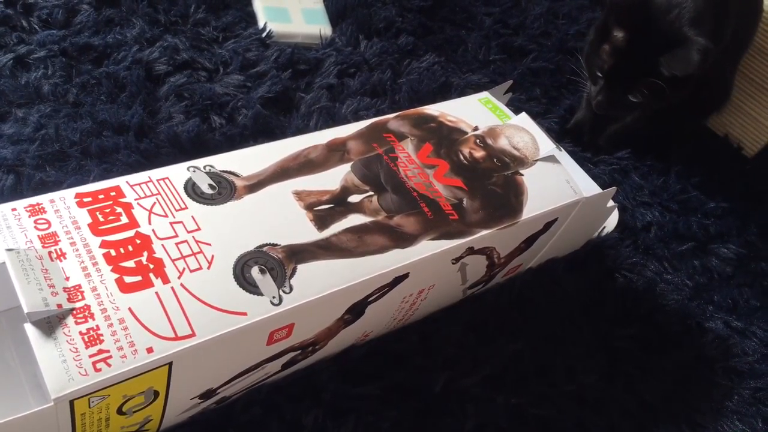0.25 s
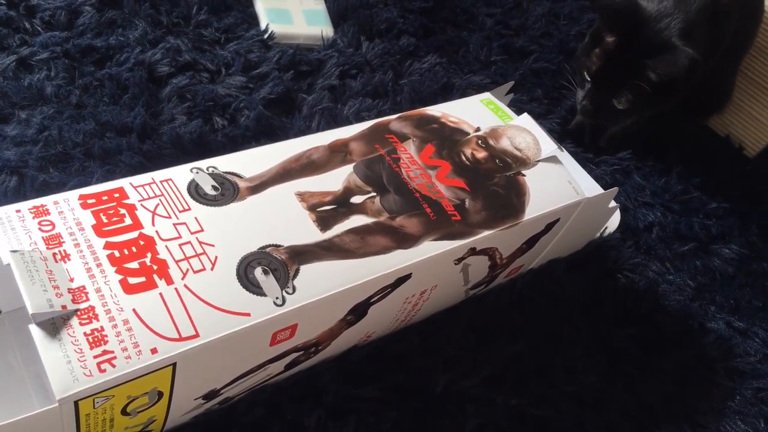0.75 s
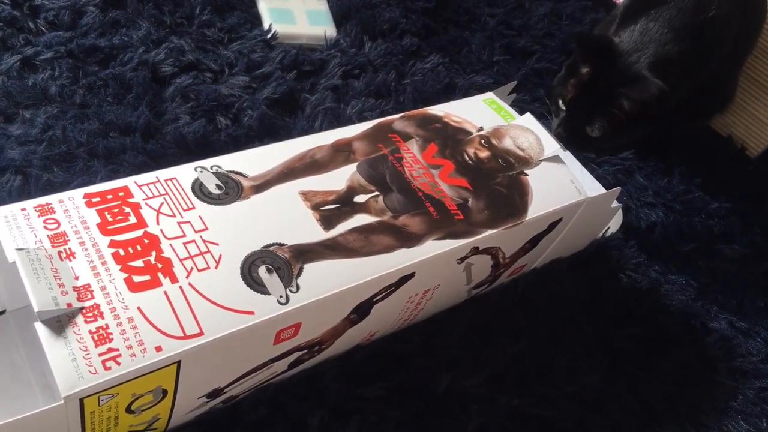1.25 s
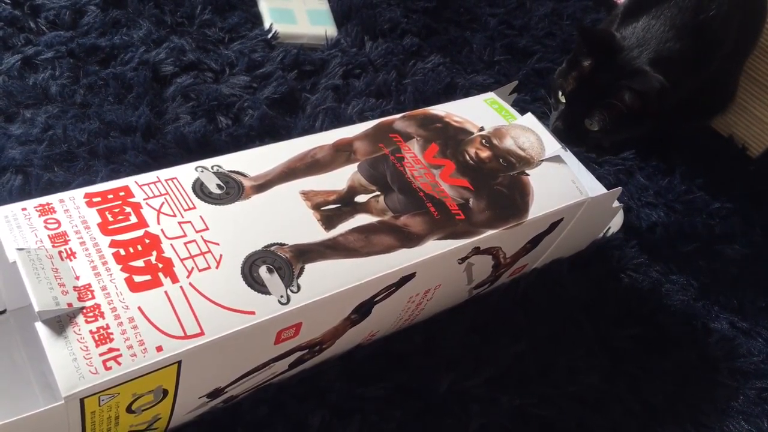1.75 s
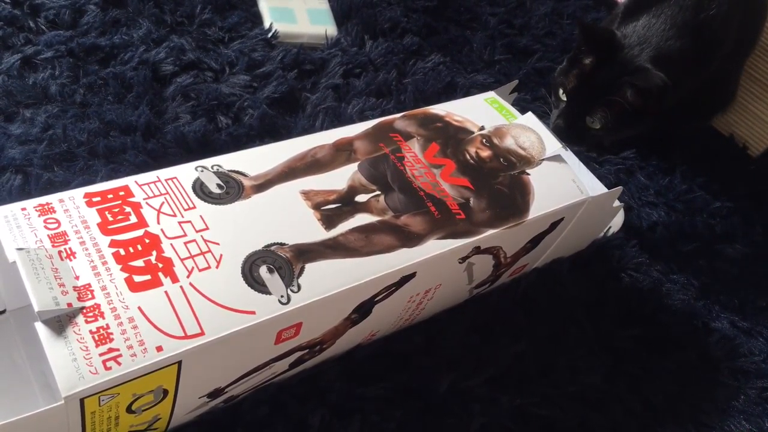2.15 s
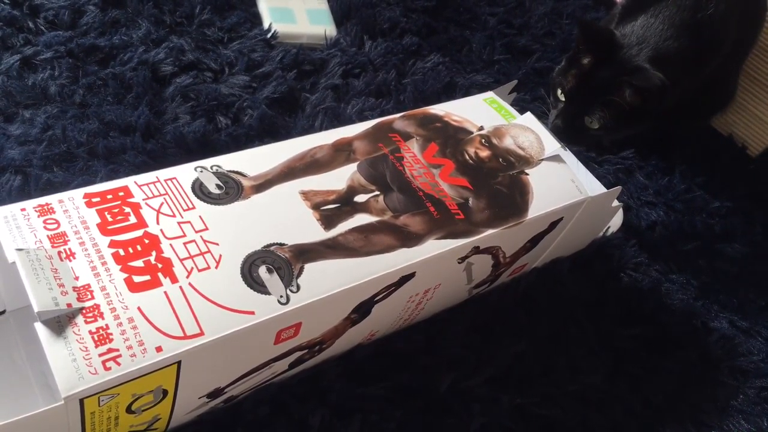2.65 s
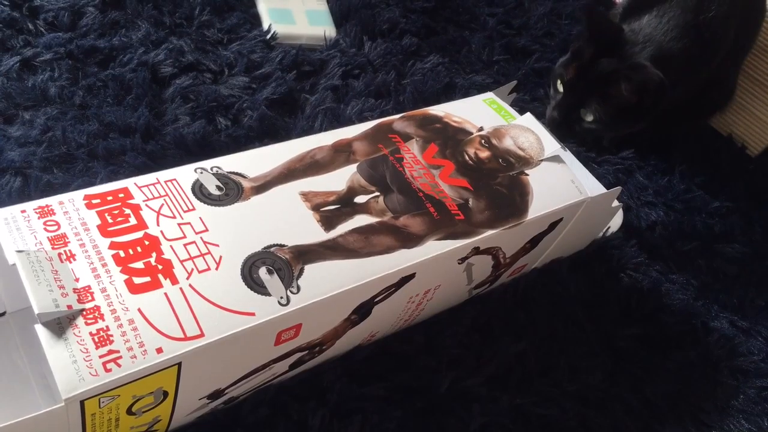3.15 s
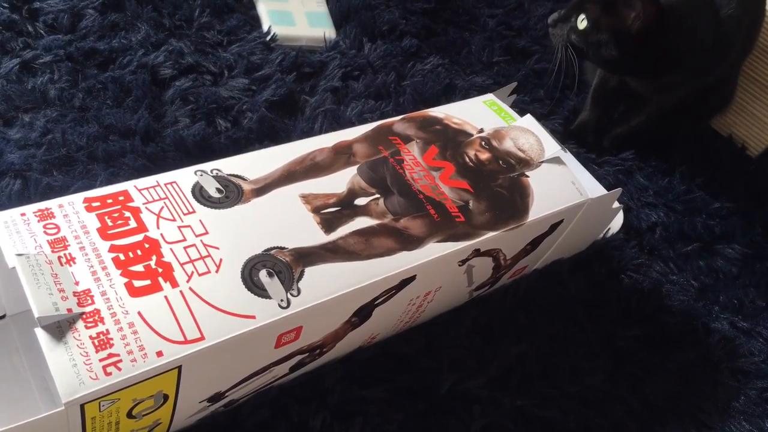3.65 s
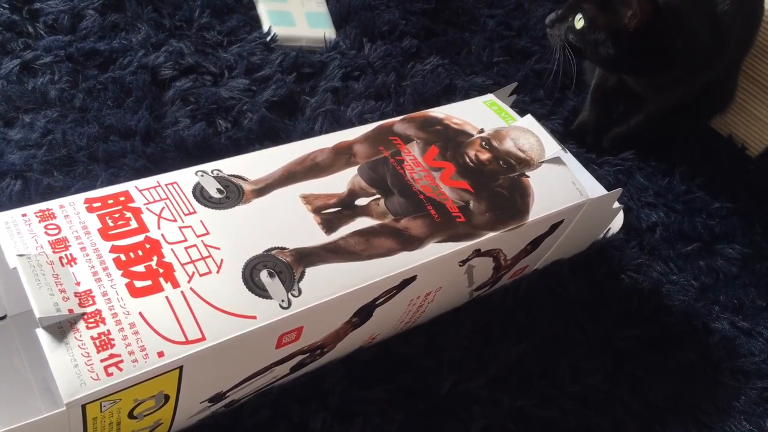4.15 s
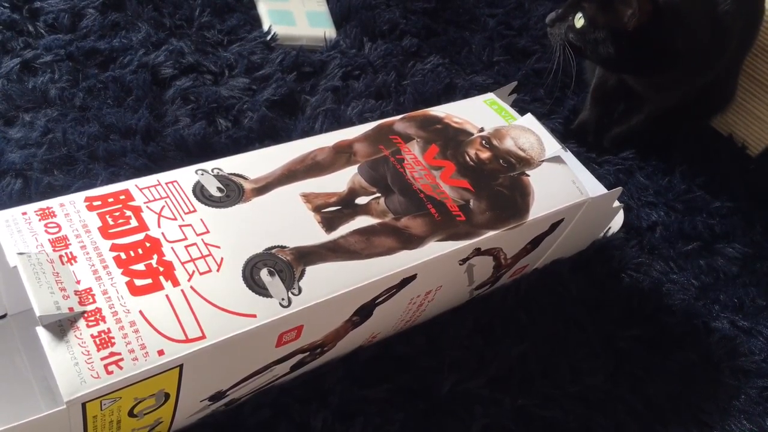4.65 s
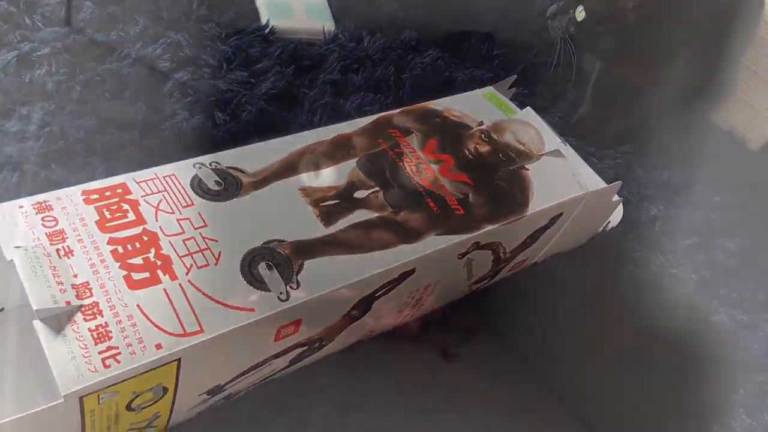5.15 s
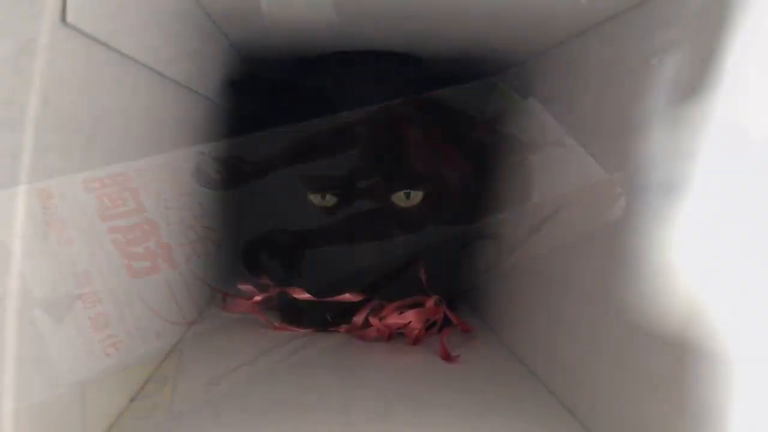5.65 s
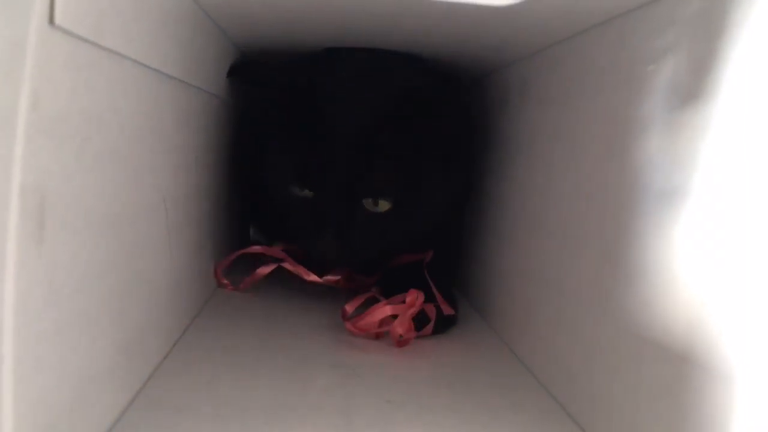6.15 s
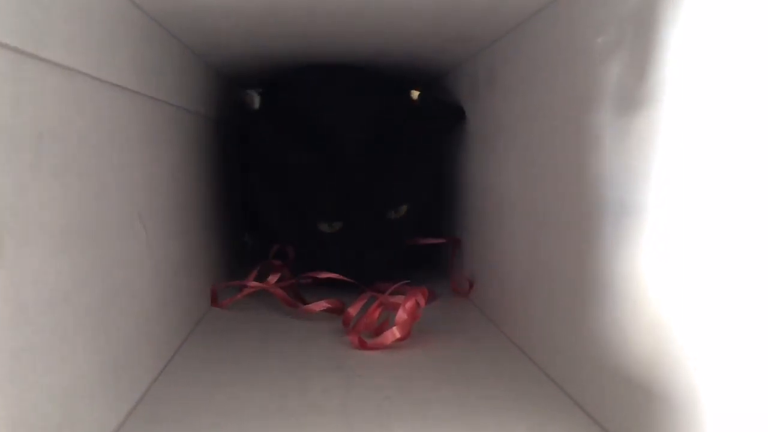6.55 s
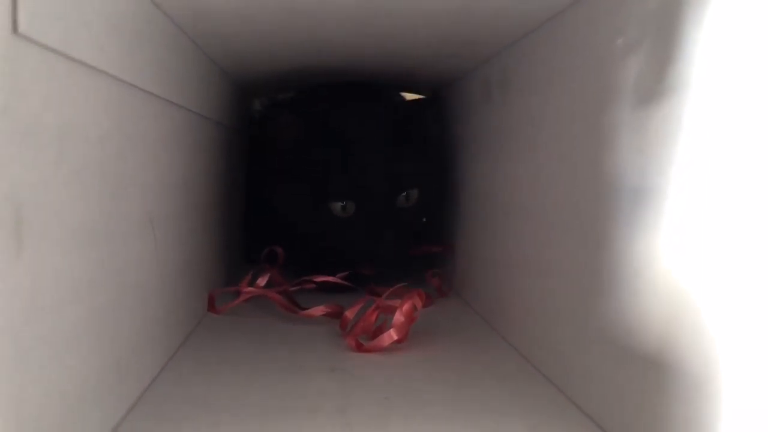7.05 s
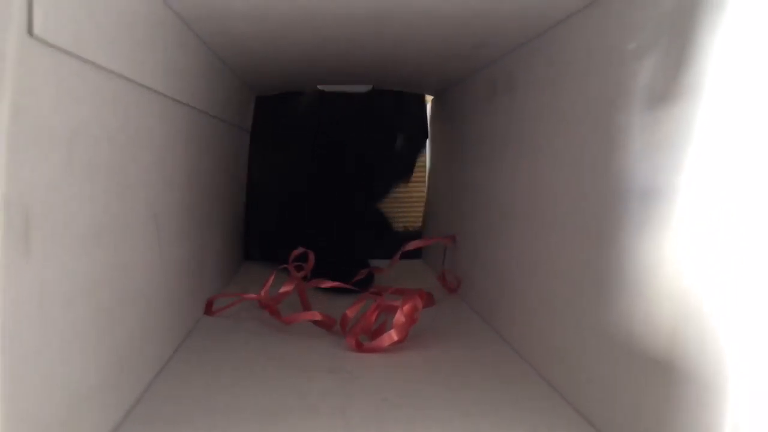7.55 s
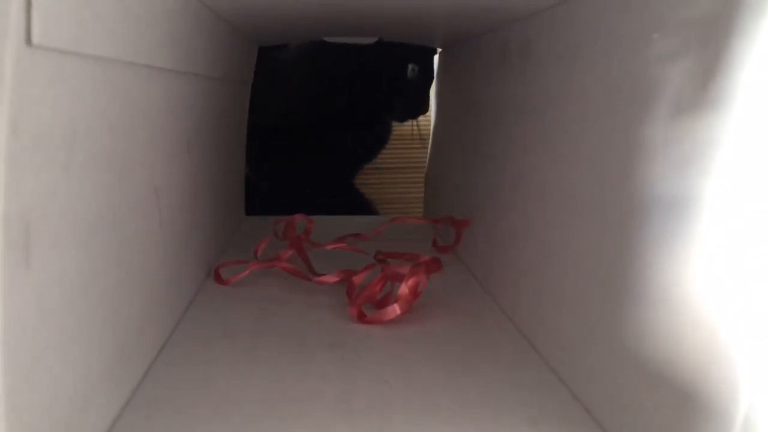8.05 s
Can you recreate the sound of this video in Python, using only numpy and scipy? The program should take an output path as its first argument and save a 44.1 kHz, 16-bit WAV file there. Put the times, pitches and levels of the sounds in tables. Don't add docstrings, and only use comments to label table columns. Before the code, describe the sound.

A phone held close beside a cardboard box catches light isolated claw clicks over faint street noise and hiss. It then bumps to the box mouth, where the sound turns hollow and low. Fur brushes the cardboard in bursts, claws scratch and tap, paws give dull knocks and one fuller thud, then a dense cluster of sharp ticks dies away into soft rumble.

```python
import sys
import numpy as np
from scipy import signal
from scipy.fft import rfft, irfft
from scipy.io import wavfile
from scipy.ndimage import uniform_filter1d

SR = 44100
rng = np.random.default_rng(int(sys.argv[2]) if len(sys.argv) > 2 else 0)


def gain_from_db(level_db):
    decades = np.asarray(level_db, float) / 20
    return 10 ** decades


def digitize_waveform(pressure):
    field = np.atleast_2d(pressure).T
    bounded = np.clip(field, -1, 1)
    quanta = np.round(bounded * 32767).astype(np.int16)
    wavfile.write(sys.argv[1], SR, quanta)


N = 366030
CHANGE_S = 4.764

# [start_s, peak_db, ring_hz, thump_db and snap_db against the ring]
TICKS = [(0.4863, -54, 2580, 5, -13), (0.5002, -51, 1750, -6, -27), (0.789, -51.5, 1760, -3, -29),
         (0.8435, -35, 1700, -6.5, -32), (0.8545, -46.5, 3460, 1, -21), (0.9415, -54.5, 1720, -14, -15),
         (1.1437, -36, 1840, -10.5, -20), (1.2619, -41.5, 1660, 4, -28), (1.2704, -50, 1660, -4, -22),
         (2.3913, -45.5, 1650, -11, -18), (3.488, -52, 1010, 5, -24), (3.544, -30, 2260, -14, -23),
         (4.2653, -38.5, 2420, -2.5, -21), (4.8095, -43, 6100, -10, -19), (5.018, -43, 2730, -13, -14)]
# [start_s, peak_db, ring_hz, thump_db and snap_db against the ring]
TAPS = [(5.4794, -62, 1630, 3, 1), (5.8592, -48, 4520, -20, 3), (5.8745, -46.5, 4130, -9, -5),
        (5.73, -61, 6000, -20, 2), (5.9848, -37, 6650, -17, -3), (6.195, -56, 3600, -14, -13),
        (6.2038, -32.5, 2230, -11, -9), (6.3539, -38, 2500, -7, -8.5), (6.3663, -44, 4000, -24, -5),
        (7.1814, -51, 3950, -14, -7), (7.4992, -37.5, 1560, -12, -20), (7.655, -34, 2150, -17, -15),
        (7.6941, -35, 3680, -20, -9), (7.7009, -33.5, 2470, -31, -4.5), (7.7485, -35, 2120, -33, -10),
        (7.7568, -31.5, 3960, -17, -15), (7.7912, -33, 4040, -26, -14), (7.8187, -42.5, 3800, -18, -13),
        (7.9271, -57, 1890, 4, -22), (7.767, -57, 8000, -24, 4), (7.775, -58, 9000, -24, 4),
        (7.737, -58, 9500, -24, 4)]
# [start_s, peak_db, ring_hz, thump_db and snap_db against the ring]
DRAGS = [(0.4405, -55, 1100, 9, -29), (0.5186, -52, 1710, -8, -26), (0.8345, -42, 2400, -18, -29),
         (1.1055, -42.5, 3370, -3.5, -16), (1.2515, -35.5, 1800, -7.5, -19.5), (2.3871, -42, 1260, 3, -7.5),
         (2.784, -56, 1670, -5, -14), (2.8046, -55.5, 1790, 2.5, -21), (4.9395, -60, 1080, 9, -4),
         (5.2346, -40.5, 2530, -6, -15), (5.561, -52, 800, 5, -20), (5.59, -54, 1100, 4, -25),
         (5.6347, -54, 1090, -10, -2), (7.7107, -42, 2450, -8, -19)]
# [pitch_hz, level_db]
BOARD = [(290, -52.5), (500, -13), (754, -8), (1150, -4), (1380, -16.5), (1580, -8), (1720, -7),
         (2110, -10), (2590, -7), (3030, -22), (3420, -8.5), (4300, -15.5), (4980, -28.5), (6490, -20.5),
         (9000, -33), (11700, -28.5), (19800, -120)]
# [pitch_hz, width_hz, level_db]
PANEL = [(360, 51, -3), (672, 93, -2.5), (224, 74, -17.5)]
TICK_MS, TAP_MS, DRAG_MS = 2.148, 2.1, 7.3
TICK_LOW_HZ, TAP_LOW_HZ = 250, 1300


def tick(db, hz, thump_db, snap_db, ms, low_hz):
    t = np.arange(2600) / SR
    u = t * 2500 / max(ms, 0.3)
    contact = u * np.exp(1 - u)
    fibres = rng.standard_normal((2, len(t))) * contact
    release = signal.unit_impulse(len(t), np.argmax(contact))

    ring = band(fibres[0] + 7.0 * release, hz * 0.96, hz * 1.04, order=1)
    struck = signal.fftconvolve(fibres[0] + 6.5 * release, causal(BOARD))[:len(t)]
    body = band(struck, low_hz, 19000, order=1)
    snap = band(fibres[1] + 2.5 * release, 5600, 9000, order=1)
    snap = band(snap, 4500, 16000, order=1)
    thump = np.zeros(len(t))
    for face_hz, width, face_db in PANEL:
        face = band(release, face_hz - width / 2, face_hz + width / 2, order=1)
        thump += gain_from_db(face_db) * face / width
    thump = band(thump, 92, 1200)

    claw = peaked(0.75 * peaked(ring) + peaked(body))
    return gain_from_db(db) * (claw + gain_from_db(snap_db + 3.0) * peaked(snap) + gain_from_db(thump_db - 2.5) * peaked(thump))


# [start_s, peak_db, pitch_hz, length_ms]
GLINTS = [(1.1075, -52, 2480, 4), (.8435, -42, 1650, 6), (1.1445, -48, 1850, 3.5), (1.139, -58, 2300, 2),
          (1.147, -54, 800, 8), (1.251, -50, 2200, 3), (1.255, -51, 4270, 4), (1.262, -50, 824, 6),
          (1.27, -56, 2550, 4), (.857, -56, 3450, 9), (6.204, -46, 4000, 2), (4.2655, -47, 711, 7),
          (4.266, -55, 1250, 4), (4.81, -50, 668, 8), (4.81, -49, 2290, 3), (5.02, -57, 3400, 3),
          (3.489, -59, 700, 8), (2.803, -61, 680, 8), (3.55, -48, 290, 14), (4.766, -54, 650, 8),
          (5.561, -49, 800, 4), (5.984, -48, 5800, 2), (6, -44, 950, 4), (7.1225, -51, 1200, 4),
          (7.128, -53, 980, 5), (7.718, -48, 2300, 2), (7.718, -50, 6600, 2), (7.132, -40, 560, 6),
          (7.185, -52, 4200, 3), (7.5, -49, 3650, 4), (7.654, -46, 2200, 5), (7.674, -51, 2250, 3),
          (7.7495, -40, 4700, 1.5), (7.761, -43, 1000, 6.5), (7.738, -56, 1800, 4), (7.792, -47, 2300, 2),
          (7.792, -50, 6340, 2), (7.798, -50, 2650, 5), (7.8, -54, 4000, 2), (7.702, -45, 5500, 2),
          (7.694, -47, 5500, 2)]


def glint(db, hz, ms):
    t = np.arange(3000) / SR
    u = t * 3000 / max(ms, 0.5)
    patch = np.sin(2 * np.pi * hz * t)
    neighbour = 0.4 * np.sin(2 * np.pi * 1.09 * hz * t)
    return gain_from_db(db) * u * np.exp(1 - u) * (patch + neighbour)


# [start_s, length_s, level_db, strong_hz, weak_hz]
RASPS = [(4.808, 0.0048, -55.5, 6460, 7500), (2.39, .006, -61, 7000, 7200),
         (7.69, 0.0072, -47, 12100, 15000), (3.543, .006, -50, 3800, 4400), (.80, 0.031, -67, 2300, 900),
         (1.046, 0.047, -71, 3100, 2500), (1.235, 0.017, -68, 1630, 2800),
         (6.624, 0.021, -47.5, 2020, 4000), (6.648, 0.024, -51, 2050, 4300),
         (7.255, 0.024, -51, 1020, 2400), (7.272, 0.06, -53, 2440, 4700), (5.951, .008, -53, 8200, 9000),
         (6.06, .02, -60, 13000, 14500), (7.666, 0.012, -47, 5600, 3500), (5.996, 0.042, -53, 6500, 3200),
         (7.407, .015, -57, 2200, 4000), (7.43, .005, -54, 6000, 4500), (7.528, .016, -55, 9190, 4500),
         (7.572, .032, -60, 2000, 3700), (7.62, .02, -58, 2000, 4000), (7.4, .07, -64, 9000, 9500),
         (5.906, .012, -54, 6590, 9500), (6.288, .007, -54, 3860, 7000), (7.164, .006, -56, 2540, 5000),
         (6.67, .009, -52, 2700, 5000), (7.707, .005, -48, 3700, 6000), (6.8, .07, -60, 3500, 900),
         (7.51, .015, -58, 2200, 1200), (6.01, .035, -55, 13500, 4200), (5.93, .03, -60, 14000, 6500),
         (7.57, .03, -62, 8200, 9600)]


def rasp(length, db, strong_hz, weak_hz):
    size = int(length * SR)
    slips = rng.standard_normal(4000) * (rng.random(4000) < 0.12)
    pressure = signal.windows.tukey(size, 0.2) * np.linspace(1.2, 0.7, size)
    slips *= np.pad(pressure, (0, 4000 - size))
    strong = evened(band(slips, strong_hz * 0.87, strong_hz * 1.1))
    weak = evened(band(slips, weak_hz * 0.82, weak_hz * 1.1))
    return gain_from_db(db) * (strong + 0.63 * weak) * np.sqrt(size / 8000)


# [start_s, peak_db, pitch_hz, time to fall 60 dB in s]
KNOCKS = [
    (0.846, -36.5, 146, 0.076),
    (1.261, -39, 145, .06),
    (2.391, -32.5, 138.5, 0.061),
    (4.762, -34, 80, 0.21),
    (4.266, -46.5, 1096, 0.029),
    (5.999, -32, 620, 0.022),
    (6.204, -36, 580, 0.032),
    (7.1325, -29, 270, 0.03),
    (3.547, -40, 1120, 0.018),
]
# [start_s, peak_db, pitch_hz, time to fall 60 dB in s]
PINGS = [
    (7.75, -34, 990, 0.045),
    (7.652, -45, 960, .05),
    (7.712, -46, 720, .05),
    (7.838, -49, 760, .03),
    (7.63, -49, 700, .03),
    (7.79, -55, 980, .04),
]
PING_SIDE_DB = -14


def knock(db, hz, t60, side_db=0):
    t = np.arange(14000) / SR
    fall_db = -60 * t / max(t60, 0.01)
    wall = np.zeros(len(t))
    for ratio, mode_db in ((0.75, -13.5), (1, 3.5), (1.38, -2), (1.8, -5.5), (3.1, -6.5)):
        mode_db = mode_db + ratio * fall_db + side_db * (ratio != 1)
        wall += gain_from_db(mode_db) * np.sin(2 * np.pi * ratio * hz * t)
    soft_start = 1 - np.exp(-t * hz / 0.78)
    return gain_from_db(db - 3.5) * band(wall * soft_start, 68, 11000)


SLAP_S, SLAP_DB, SLAP_MS = 7.1228, -29.5, 4.6
SLAP_HZ = (620, 300)


def slap():
    u = np.arange(3000) / SR * 1000 / SLAP_MS
    hz = SLAP_HZ[1] + (SLAP_HZ[0] - SLAP_HZ[1]) * np.exp(-u / 0.9)
    return gain_from_db(SLAP_DB) * u * np.exp(0.5 - u ** 2 / 2) * np.sin(2 * np.pi * np.cumsum(hz) / SR)


# [pitch_hz, level_db]
FUR = [(1410, -15), (2400, -6.5), (2670, -1), (3030, -6.5), (3400, 1), (3880, 1.5), (4900, -2.5),
       (6600, -4), (7660, -9.5), (9040, -4.5), (10600, -11.5), (11700, -8.5), (13500, -9.5), (16600, -13),
       (17400, -16)]
# [pitch_hz, width_hz, level_db]
TUBE = [(940, 82, 3), (2240, 200, -5), (4300, 2400, -8), (5800, 140, -7), (8450, 1900, -13),
        (11600, 150, -15)]
# [pitch_hz, level_db]
SCUFF = [(260, -34), (450, -3), (599, -1.5), (766, -4), (987, -3.5), (1350, -7.5), (1830, -9.5),
         (2170, -10), (3000, -17.5), (3900, -54), (6600, -120)]
# [time_s, pressure_db, brightness_db against the pressure]
LEAN = [
    (4.77, -78, -4.5),
    (5.38, -77.5, 1.5),
    (5.73, -66.5, -4.5),
    (5.85, -69.5, -0.5),
    (5.87, -58, -1.5),
    (6.62, -57.5, -4.5),
    (6.74, -62, -0.5),
    (7.66, -66, 1.5),
    (7.9, -70.5, -9),
]
# [start_s, length_s, pressure_db, brightness_db against the pressure]
STROKES = [(.97, .15, -76.5, -6), (5.916, 0.18, -49.5, -4), (6.11, .07, -56, -11), (6.21, .06, -60, -8),
           (6.27, .05, -61, -6), (6.332, 0.055, -54, -3), (6.608, 0.11, -53, -16), (6.741, .19, -53, -7),
           (7.13, .07, -59, -6), (7.24, .1, -57, -2), (7.374, 0.091, -65, 3), (7.515, .05, -60, 3),
           (7.46, .19, -60.5, 6), (7.644, 0.044, -52.5, -6), (7.695, 0.036, -48.5, -11),
           (7.792, .05, -66, -11), (7.828, 0.071, -63, -12), (6.93, 0.18, -65.5, -2)]
STROKE_PEAK, LET_GO_S = 0.57, 0.015
SCUFF_DB, SCUFF_SLOPE, SCUFF_TOP_DB = -0.5, -0.37, 9


def rub():
    t = np.arange(N) / SR
    clumps = gain_from_db(1.33 * evened(uniform_filter1d(rng.standard_normal(N), 300)))
    strength = gain_from_db(2.1 * np.minimum(rng.exponential(1, N), 5))
    happens = rng.random(N) < 5000 / SR
    slips = strength * happens * rng.choice([-1., 1.], N)
    slips = patchy(slips * clumps, patchy_db=2.0, size=9)
    for hz, width, db in TUBE:
        slips = slips + 0.5 * gain_from_db(db / 2) * band(slips, hz - width / 2, hz + width / 2, order=1)
    fur = coloured(slips, FUR)
    mid = signal.sosfiltfilt(signal.butter(2, 7600, fs=SR, output="sos"), fur)

    let_go = np.exp(-np.maximum(t - LEAN[-1][0], 0) / LET_GO_S)
    lean = gain_from_db(curve(LEAN, t, axis=1)) * (t > CHANGE_S) * let_go
    strokes = swells(STROKES, STROKE_PEAK)
    press = np.sqrt(lean ** 2 + (strokes ** 2).sum(0))
    lean_bright = lean * gain_from_db(curve(LEAN, t, axis=2))
    stroke_bright_power = gain_from_db(np.array(STROKES)[:, 3]) ** 2 @ strokes ** 2
    bright = np.sqrt(lean_bright ** 2 + stroke_bright_power)

    press_db = 20 * np.log10(press + 1e-9)
    scuff_db = np.minimum(SCUFF_DB + SCUFF_SLOPE * (press_db + 60), SCUFF_TOP_DB)
    scuff = coloured(slips, SCUFF) * press * gain_from_db(scuff_db)
    return gain_from_db(-1.5) * (evened(mid) * press + evened(fur - mid) * bright + scuff)


# [pitch_hz, level_db]
BOOM_OUT = [(21, -54), (35, -7.5), (49, -13), (73, -2), (92, -1), (129, -8), (161, -17), (187, -17.5),
            (211, -15.5), (367, -24.5), (450, -41), (580, -69), (990, -120)]
# [pitch_hz, level_db]
BOOM_IN = [(21, -39), (35, -16), (81, 3.5), (128, -4), (156, -11), (189, 0.5), (200, -10.5), (220, -13),
           (264, -12.5), (297, -9), (330, -20.5), (379, -18), (422, -28), (450, -30), (580, -70),
           (990, -120)]
# [start_s, length_s, level_db]
BUMPS = [
    (4.75, .15, -40),
    (5.02, 0.35, -47.5),
    (5.96, 0.11, -45.5),
    (6.17, 0.13, -38),
    (6.28, .11, -35),
    (7.08, .12, -47),
    (7.24, .13, -40),
    (2.6, 0.28, -53),
    (3.15, .2, -52),
    (7.52, .16, -47.5),
]
BOOM_DB, HUM_DB = (-55, -51), (-65, -52)
BOOM_SINK_DB_PER_S, HUM_SINK_DB_PER_S = 0.5, 1.83
SWAY_DB, FADE_IN_S, FADE_OUT_S = 1.5, 0.12, 0.16
CAR_HUM_DB = -65


def rumble():
    t = np.arange(N) / SR
    outside = coloured(rng.standard_normal(N), BOOM_OUT)
    inside = coloured(rng.standard_normal(N), BOOM_IN)
    low = np.where(t < CHANGE_S, outside, inside)
    boom = signal.sosfiltfilt(signal.butter(4, 135, fs=SR, output="sos"), low)
    hum = low - boom
    boom = boom / np.sqrt(uniform_filter1d(boom ** 2, 9000) + 1e-9)
    hum = hum / np.sqrt(uniform_filter1d(hum ** 2, 20000) + 1e-9)

    wander = uniform_filter1d(uniform_filter1d(rng.standard_normal(N), 3000), 3000)
    sway = gain_from_db(SWAY_DB * evened(wander))
    bumps = swells(BUMPS, peak=0.44).sum(0)
    edges = np.clip(np.minimum(t / FADE_IN_S, (N / SR - t) / FADE_OUT_S) + 0.2, 0, 1)
    boom_gain = np.hypot(placed(BOOM_DB, BOOM_SINK_DB_PER_S) * sway, bumps) * edges
    extra_hum = gain_from_db(-21) * bumps + gain_from_db(CAR_HUM_DB - 4.8 * t ** 3)
    hum_gain = np.hypot(placed(HUM_DB, HUM_SINK_DB_PER_S), extra_hum)
    return boom * boom_gain + hum * hum_gain


# [time_s, level_db]
DRONE_LEVEL = [(5.3, -63), (5.6, -57), (5.97, -51), (6.39, -60), (6.66, -52.5), (7.25, -50), (8.1, -56),
               (8.3, -63)]
DRONE_HZ, DRONE_START_S, DRONE_GLIDE_HZ, DRONE_GLIDE_S = 54, 5.3, 7, 0.119


def drone():
    t = np.arange(N) / SR
    noise = rng.standard_normal((2, N))
    waver = evened(uniform_filter1d(uniform_filter1d(noise, 4000), 4000))
    glide = DRONE_GLIDE_HZ * np.exp(-np.maximum(t - DRONE_START_S, 0) / DRONE_GLIDE_S)
    phase = 2 * np.pi * np.cumsum(DRONE_HZ + glide + 1.5 * waver[0]) / SR
    gain = gain_from_db(curve(DRONE_LEVEL, t, axis=1) + 5.5 + 2.5 * waver[1])
    return gain * np.sin(phase) * np.clip((t - 5.2) / 0.36, 0, 1)


# [pitch_hz, level_db]
CAR = [(350, -25), (600, 3.5), (655, -21), (951, 2.5), (1430, -5.5), (1570, -3.5), (1700, -6.5),
       (4000, -30), (5200, -57), (8800, -120)]
CAR_DB, CAR_FADE_DB, CAR_BEND = -67, -6.5, 1.9


def car():
    t = np.arange(N) / SR
    return coloured(rng.standard_normal(N), CAR) * gain_from_db(CAR_DB + CAR_FADE_DB * t ** CAR_BEND)


# [pitch_hz, level_db]
WASH = [(240, -13), (400, -4), (567, 0), (754, -4), (1140, -5.5), (1270, -8.5), (1630, -9.5), (5000, -25),
        (6500, -60), (11000, -120)]
# [pitch_hz, level_db]
HISS = [(1470, -19), (2500, 1), (2890, -8.5), (2990, -4), (3430, -0.5), (4900, -5.5), (5230, -2.5),
        (6790, -3), (7980, -5.5), (9700, -3.5), (10300, -12), (11200, -5), (14700, -8.5), (16600, -11.5),
        (17400, -18)]
HISS_DB = -78
DULL_DB, BRIGHT_DB = (-75, -64.5), (-77, -71)
WASH_SINK_DB_PER_S = 1.14


def floor():
    wash = patchy(coloured(rng.standard_normal(N), WASH), patchy_db=1.5, size=10)
    dull = signal.sosfiltfilt(signal.butter(3, 950, fs=SR, output="sos"), wash)
    street = evened(dull) * placed(DULL_DB, WASH_SINK_DB_PER_S)
    street += evened(wash - dull) * placed(BRIGHT_DB, WASH_SINK_DB_PER_S)
    return street + gain_from_db(HISS_DB) * coloured(rng.standard_normal(N), HISS)


# [pitch_hz, time to fall 60 dB in s]
ROOM = [(200, 0.16), (1000, 0.21), (3000, 0.14), (6000, 0.077)]
ROOM_DB = (-15, -20)


def room(x):
    taps = np.zeros(SR // 2)
    at = np.arange(300, len(taps) - 20, 20)
    taps[at + rng.integers(0, 20, len(at))] = rng.choice([-1., 1.], len(at))
    hz, t, z = signal.stft(taps, SR, nperseg=256)
    decay = gain_from_db(-60 * t / read(ROOM, hz)[:, None])
    tail = signal.istft(z * decay, SR, nperseg=256)[1]
    return signal.fftconvolve(x, tail / np.linalg.norm(tail))[:N]


def evened(x):
    return x / np.sqrt(np.mean(x ** 2) + 1e-20)


def peaked(x):
    return x / abs(x).max()


def read(points, hz):
    f, value = np.transpose(points)
    return np.interp(np.log(hz + 1), np.log(f + 1), value)


def curve(rows, t, axis):
    rows = np.array(rows)
    return np.interp(t, rows[:, 0], rows[:, axis])


def band(x, lo_hz, hi_hz, order=2):
    return signal.sosfilt(signal.butter(order, [lo_hz, hi_hz], "band", fs=SR, output="sos"), x)


def coloured(x, points):
    hz = np.fft.rfftfreq(len(x), 1 / SR)
    inside = (hz > points[0][0]) & (hz < points[-1][0])
    return evened(irfft(rfft(x) * gain_from_db(read(points, hz)) * inside, len(x)))


def causal(points):
    hz = abs(np.fft.fftfreq(2048, 1 / SR))
    log_gain = np.log(gain_from_db(np.maximum(read(points, hz), -70)))
    return np.fft.ifft(np.exp(np.conj(signal.hilbert(log_gain)))).real[:1024]


def patchy(x, patchy_db, size):
    z = signal.stft(x, nperseg=512, noverlap=384)[2]
    field = rng.standard_normal(z.T.shape).T
    field = evened(uniform_filter1d(uniform_filter1d(field, size, 0), size, 1))
    return evened(signal.istft(z * gain_from_db(patchy_db * field), nperseg=512, noverlap=384)[1][:N])


def swells(rows, peak):
    t = np.arange(N) / SR
    out = np.zeros((len(rows), N))
    bend = np.log(0.5) / np.log(np.clip(peak, 0.1, 0.9))
    for line, (start, length, db) in zip(out, np.array(rows)[:, :3]):
        u = np.clip((t - start) / length, 0, 1) ** bend
        line += gain_from_db(db) * np.sin(np.pi * u) ** 2
    return out


def placed(db, sink_db_per_s):
    since = np.arange(N) / SR - CHANGE_S
    return gain_from_db(np.where(since < 0, db[0], db[1] - sink_db_per_s * since))


def add(mix, s, sound):
    part = mix[round(s * SR):][:len(sound)]
    part += sound[:len(part)]


def scene():
    hits = np.zeros(N)
    for s, *row in TICKS:
        add(hits, s, tick(*row, TICK_MS, TICK_LOW_HZ))
    for s, *row in TAPS:
        add(hits, s, tick(*row, TAP_MS, TAP_LOW_HZ))
    for s, *row in DRAGS:
        add(hits, s, tick(*row, DRAG_MS, TICK_LOW_HZ))
    for s, *row in GLINTS:
        add(hits, s, glint(*row))
    for s, *row in RASPS:
        add(hits, s, rasp(*row))
    for s, *row in KNOCKS:
        add(hits, s, knock(*row))
    for s, *row in PINGS:
        add(hits, s, knock(*row, PING_SIDE_DB))
    add(hits, SLAP_S, slap())
    bed = rub() + rumble() + drone() + car() + floor()
    return (hits + room(hits * placed(ROOM_DB, 0)) + bed)[None]


def band_limit(x):
    return signal.sosfilt(signal.butter(12, 17550, fs=SR, output="sos"), x)


def record(dry):
    return band_limit(dry)


dry = scene()
out = record(dry)
digitize_waveform(out)
```